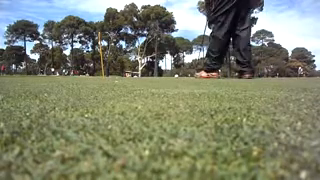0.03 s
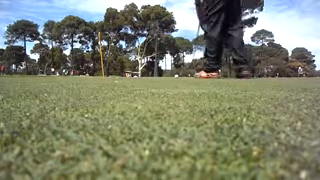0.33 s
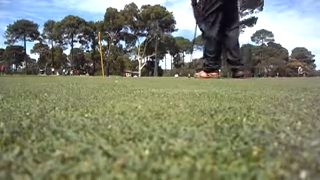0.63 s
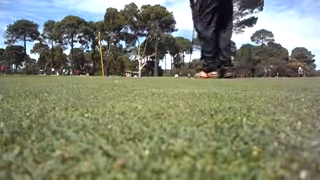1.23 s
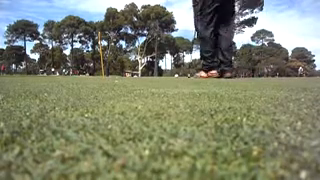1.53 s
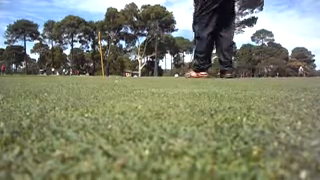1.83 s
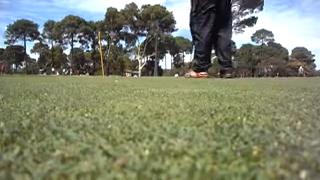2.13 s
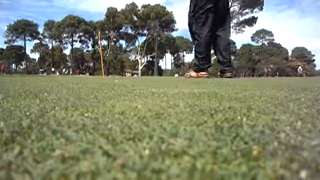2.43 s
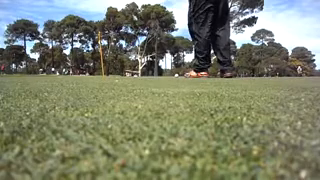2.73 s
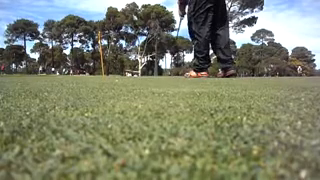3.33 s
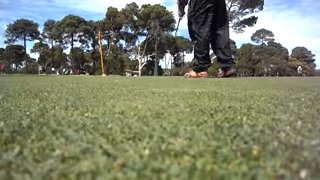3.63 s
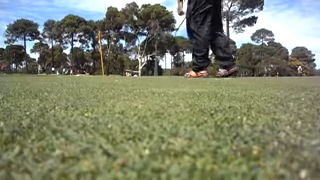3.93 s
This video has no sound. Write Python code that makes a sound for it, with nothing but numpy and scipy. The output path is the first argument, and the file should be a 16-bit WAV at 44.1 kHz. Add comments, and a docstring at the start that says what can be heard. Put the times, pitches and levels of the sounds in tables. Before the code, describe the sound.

Low wind buffets a microphone on the grass, eases, then builds again over a quiet outdoor hush. Near the end comes one light click of a golf putt, followed by heavier wind thumps and a short overload crack.

```python
"""On a golf green, a microphone lies on the grass a few metres from a putter tapping a ball.
Wind rumbles on the microphone, and its eddies buffet it in short gusts and thumps;
the hardest thump overloads it with a crack. Behind are a quiet outdoor hush,
one small dry tick near the player and three faint far hoots, probably a bird."""
import sys
import numpy as np
from scipy import signal
from scipy.fft import rfft, irfft
from scipy.io import wavfile
from scipy.ndimage import uniform_filter1d

SR = 44100
rng = np.random.default_rng(int(sys.argv[2]) if len(sys.argv) > 2 else 0)


def generate_wav(signal):
    """Clip the signal to [-1, 1] and save it as 16-bit WAV at the path in sys.argv[1]."""
    frames = np.transpose(np.atleast_2d(signal))
    scaled = np.clip(frames, -1, 1) * 32767
    pcm = np.round(scaled).astype(np.int16)
    wavfile.write(sys.argv[1], SR, pcm)


N = 176400


def amp(db):
    """Decibels to gain."""
    return 10 ** (np.asarray(db) / 20)


def unit(x):
    """Scales to rms 1."""
    return x / np.sqrt(np.mean(x ** 2) + 1e-20)


def spectrum_db(points, hz):
    """Interpolates a spectrum on a log-frequency axis."""
    point_hz, db = np.transpose(points)
    return np.interp(np.log(hz + 1), np.log(point_hz + 1), db)


def add(mix, start_s, sound):
    """Mixes a sound in at a time."""
    part = mix[max(round(start_s * SR), 0):][:len(sound)]
    part += sound[:len(part)]


def drift(length_s):
    """A smooth random curve that changes over length_s."""
    window = np.hanning(max(int(length_s * SR), 3))
    return unit(signal.fftconvolve(rng.standard_normal(N), window, "same"))


def turbulence(gain, steady_s):
    """Noise of a given spectrum, with its loudness held steady over steady_s."""
    size = 2 * (len(gain) - 1)
    noise = signal.hilbert(irfft(rfft(rng.standard_normal(size)) * gain))
    power = abs(noise) ** 2
    for _ in range(2):
        power = uniform_filter1d(power, max(int(steady_s * SR), 2), mode="wrap")
    return noise.real / np.sqrt(abs(power) / 2 + 1e-20)


def ring(modes, contact_s=0.0001):
    """Damped modes of alternating sign, set off by a brief contact."""
    t = np.arange(SR // 5) / SR
    attack = 1 - np.exp(-t / contact_s)
    return attack * sum((-1) ** k * amp(db - 60 * t / t60_s) * np.sin(2 * np.pi * hz * t)
                        for k, (hz, db, t60_s) in enumerate(modes))


# Ambience far around the green: frequency_hz, relative_density_db
HUSH_SPECTRUM = [(20, -2), (100, 0), (200, -1), (400, -6), (700, -10), (1100, -16), (1800, -23),
                 (3500, -26.5), (6500, -29), (10000, -31)]

def hush(level_db=-60, patch_db=1.1, swell_db=-0.2):
    """Distant air and trees: drifting patches of noise that give way to even hiss in the treble."""
    frames, hz = N // 256 + 5, np.fft.rfftfreq(1024, 1 / SR)
    real, imag, patch_noise = rng.standard_normal((3, frames, len(hz)))
    slow_noise = uniform_filter1d(patch_noise, size=16, axis=0)
    patches = unit(uniform_filter1d(slow_noise, size=8, axis=1))
    swell = unit(uniform_filter1d(rng.standard_normal(frames), size=80))[:, None]
    movement_db = (patch_db * patches + swell_db * swell) / (1 + (hz / 2500) ** 2)
    spectra = (real + 1j * imag) * amp(spectrum_db(HUSH_SPECTRUM, hz) + movement_db)
    air = signal.istft(spectra.T, nperseg=1024, noverlap=768)[1][:N]
    return amp(level_db) * unit(air)


# Strength of the wind at the microphone: time_s, relative_level_db
WIND_STRENGTH = [(0, -40), (.11, -50.5), (0.141, -39), (.19, -46.5), (0.389, -41), (.46, -26), (.56, -33.5),
                 (.6, -26.5), (.69, -33), (.74, -36), (.84, -45.5), (.91, -37), (.98, -52.5), (1.5, -47),
                 (1.72, -36.5), (1.832, -31.5), (1.92, -40.5), (2.02, -28.5), (2.17, -36.5), (2.26, -29.5),
                 (2.31, -31), (2.44, -28.5), (2.57, -38.5), (2.689, -24.5), (2.79, -41), (2.84, -36.5),
                 (2.92, -43), (3.05, -33.5), (3.26, -30), (3.42, -33.5), (3.57, -21.5), (3.68, -28.5),
                 (3.75, -31.5), (3.88, -37), (4, -24)]
# Its rumble on the microphone: frequency_hz, relative_density_db
RUMBLE_SPECTRUM = [(10, -9.5), (22, 3.5), (40, 5), (70, -1), (105, -6.5), (150, -21.5), (220, -30.5),
                   (320, -40), (500, -50), (1000, -66.5), (2000, -88.5)]

def wind_rumble(trim_db=-2.5, flutter_db=2.5, flutter_s=0.029):
    """Low turbulence on the microphone that flutters and follows the strength of the wind."""
    wind_db = np.interp(np.arange(N) / SR, *np.transpose(WIND_STRENGTH))
    envelope = amp(wind_db + trim_db + flutter_db * drift(flutter_s))
    colour = amp(spectrum_db(RUMBLE_SPECTRUM, np.fft.rfftfreq(N, 1 / SR)))
    return envelope * turbulence(colour, steady_s=0.06)


# A tick near the player: start_s, level_db, pitch_hz, t60_s
TICKS = [(.182, -50, 1100, .007)]

def tick():
    """A small dry tick: one mode that dies within milliseconds."""
    out = np.zeros(N)
    for start_s, level_db, pitch_hz, t60_s in TICKS:
        add(out, start_s, ring([(pitch_hz, level_db, t60_s)]))
    return out


# Gusts right on the microphone: centre_s, half_length_s, level_db, eddy_hz
MIC_GUSTS = [(0.456, 0.012, -25.5, 115), (.505, 0.017, -24, 103), (0.611, 0.037, -33, 115),
             (.682, 0.0058, -26, 90), (1.752, .03, -39.5, 100), (1.999, 0.015, -25.5, 75),
             (2.045, 0.015, -26.5, 70.4), (2.456, 0.013, -29, 89.5), (2.783, 0.01, -21, 67.6),
             (3.017, .008, -33, 133), (3.061, 0.0083, -25, 149), (3.144, .011, -22, 199),
             (3.188, 0.016, -20.5, 180), (3.221, 0.011, -28.5, 198), (3.28, 0.02, -24.5, 122.5),
             (3.557, 0.015, -26.5, 135), (3.591, 0.011, -20.5, 176), (3.623, 0.0087, -26, 158),
             (3.729, .014, -15, 156), (3.755, 0.014, -20, 244), (3.82, 0.036, -27, 124),
             (3.96, 0.025, -29.5, 103)]

def gusts(housing_hz=325, housing_width_hz=36, housing_db=3.5, abruptness=3.02, size=16384):
    """Bursts of turbulence excite the hollow microphone housing; faster eddies reach higher."""
    out = np.zeros(N)
    hz, t = np.fft.rfftfreq(size, 1 / SR), (np.arange(size) - size / 2) / SR
    housing = amp(housing_db / (1 + (2 * (hz - housing_hz) / housing_width_hz) ** 2))
    for centre_s, half_length_s, level_db, eddy_hz in MIC_GUSTS:
        ratio = hz / eddy_hz
        low_cut = ratio ** 2 / (ratio ** 2 + 0.12 ** 2)
        high_cut = 1 / np.sqrt(1 + ratio ** 8.64)  # 26 dB per octave above eddy_hz
        envelope = amp(level_db) * np.exp(-0.5 * abs(t / half_length_s) ** abruptness)
        add(out, centre_s + t[0], envelope * turbulence(housing * low_cut * high_cut, steady_s=0.028))
    return out


# Single eddies that hit the microphone: centre_s, peak_db, eddy_hz
EDDIES = [(0.681, -31, 114), (2.001, -21, 74), (2.003, -37.5, 215), (2.781, -25, 75.5), (2.778, -38.5, 201),
          (3.132, -7.5, 106), (3.138, -20, 215), (3.177, -20.5, 146), (3.189, -18, 121),
          (3.236, -26.5, 153), (3.26, -18, 85), (3.582, -36.5, 260), (3.589, -23.5, 128),
          (3.747, -14.5, 149), (3.761, -18, 205)]

def eddy_thumps(size=8192):
    """Each eddy passes the microphone as one smooth dip of pressure."""
    out, t = np.zeros(N), (np.arange(size) - size / 2) / SR
    for centre_s, peak_db, eddy_hz in EDDIES:
        dip = -((1 - 1j * np.pi * eddy_hz * t) ** -3).real  # its spectrum peaks at eddy_hz
        add(out, centre_s + t[0], amp(peak_db) * np.hanning(size) * dip)
    return out


# Hoots far from the green: start_s, length_s, level_db, pitch_hz
FAR_HOOTS = [(.9, 0.086, -60.5, 386), (3.39, 0.18, -56.5, 457.5), (3.62, 0.078, -60.5, 500)]

def hoots(sag_hz_per_s2=1400, waver_share=0.01):
    """Soft, nearly pure notes, probably a bird, that waver and sag in pitch."""
    out = np.zeros(N)
    for start_s, length_s, level_db, pitch_hz in FAR_HOOTS:
        t = np.arange(0, length_s, 1 / SR)
        waver = 1 + waver_share * drift(length_s=0.015)[:len(t)]
        hz = (pitch_hz - sag_hz_per_s2 * t ** 2) * waver
        envelope = amp(level_db) * np.sin(np.pi * t / length_s)
        add(out, start_s, envelope * np.sin(2 * np.pi * np.cumsum(hz) / SR))
    return out


# The stroke, a few metres from the microphone: start_s, gain_db
PUTTS = [(3.043, -37.5)]
# Modes of the putter head and ball: pitch_hz, relative_level_db, t60_s
HEAD_AND_BALL_MODES = [(900, -7, 0.015), (1250, -1.5, 0.0048), (1600, -9, 0.0094), (2900, -23, .004),
                       (4200, -23, .01), (6080, -28, 0.016)]

def putt():
    """The putter taps the ball, and both ring briefly."""
    out = np.zeros(N)
    for start_s, gain_db in PUTTS:
        add(out, start_s, amp(gain_db) * ring(HEAD_AND_BALL_MODES))
    return out


# Overload in the microphone at the hardest thump: centre_s, peak_db
OVERLOADS = [(3.1337, -28)]
# Colour of the crack: frequency_hz, relative_level_db
CRACK_SPECTRUM = [(200, -11), (700, 7), (1200, -2.5), (2500, -11), (3400, -20), (4600, -24), (5500, -21),
                  (7400, -15), (8600, -24), (10000, -24.5)]

def overload_crack(size=2048):
    """One sharp, dry pulse as the microphone reaches its limit."""
    out = np.zeros(N)
    colour = amp(spectrum_db(CRACK_SPECTRUM, np.fft.rfftfreq(size, 1 / SR)))
    pulse = np.fft.fftshift(irfft(colour))
    for centre_s, peak_db in OVERLOADS:
        add(out, centre_s - size / 2 / SR, -amp(peak_db) * pulse / pulse.max())
    return out


def scene():
    """Everything that reaches the one microphone on the grass."""
    mix = hush() + wind_rumble() + tick() + gusts() + eddy_thumps() + hoots() + putt() + overload_crack()
    return mix[None]


def record(dry):
    """The recorder cuts off the top of the treble."""
    edge_hz = 10050
    lowpass = signal.firwin(801, edge_hz, window=("kaiser", 8), fs=SR)
    return signal.oaconvolve(dry, lowpass[None], "same")


dry = scene()
out = record(dry)
generate_wav(out)
```